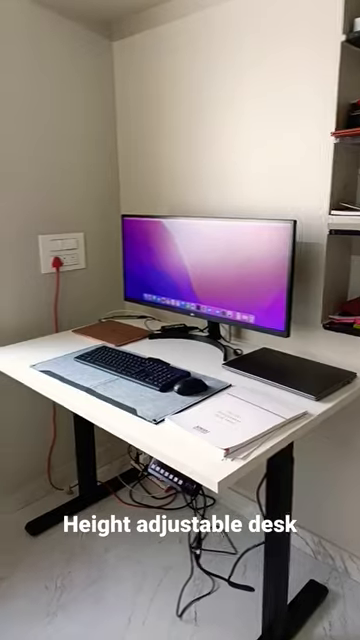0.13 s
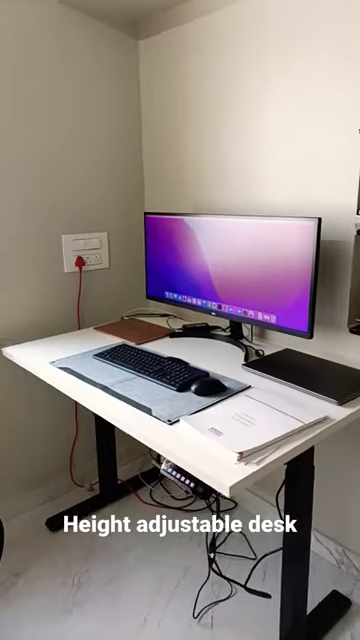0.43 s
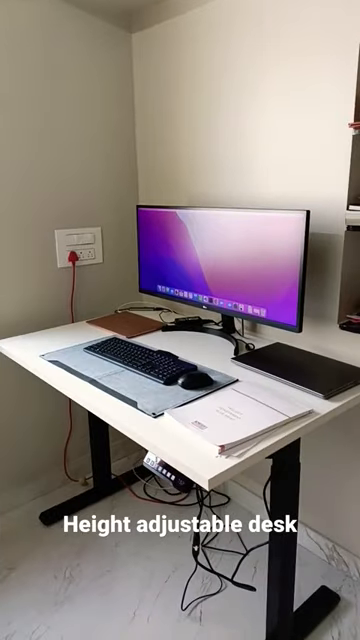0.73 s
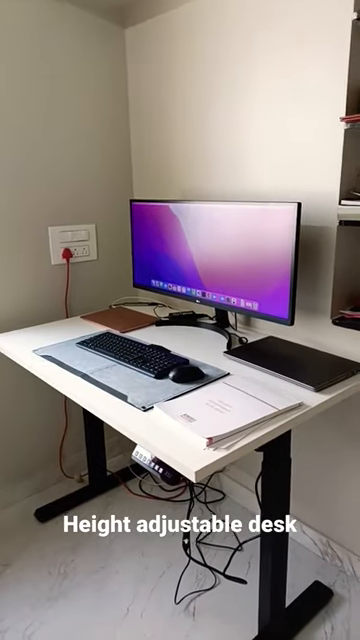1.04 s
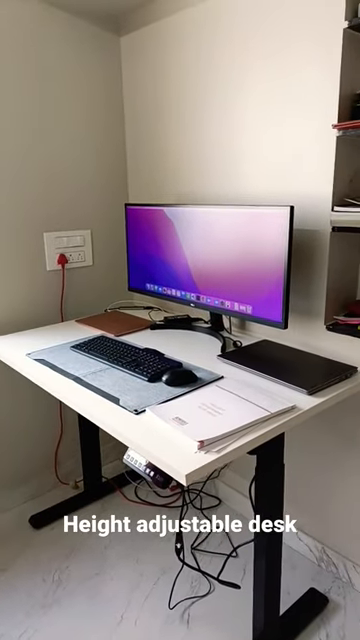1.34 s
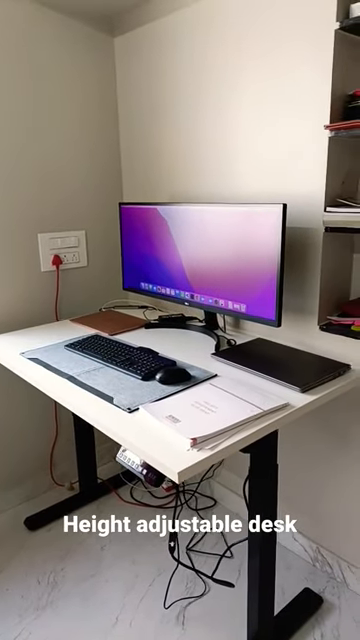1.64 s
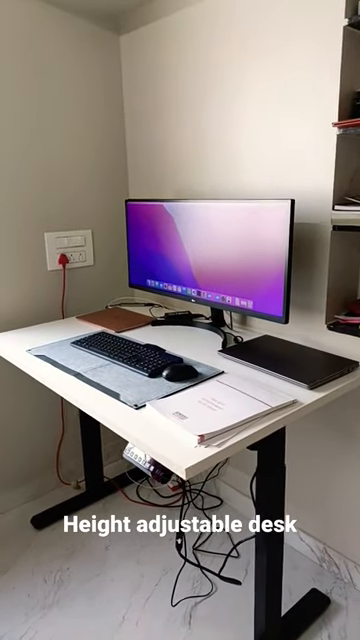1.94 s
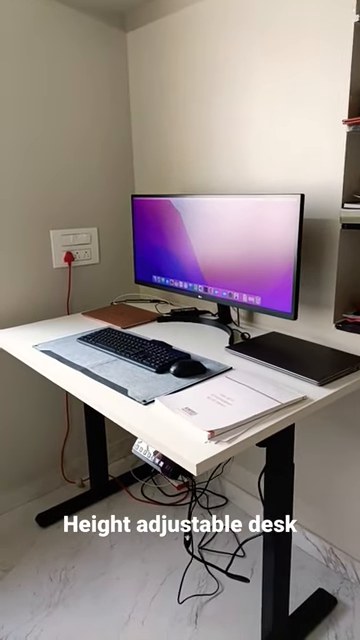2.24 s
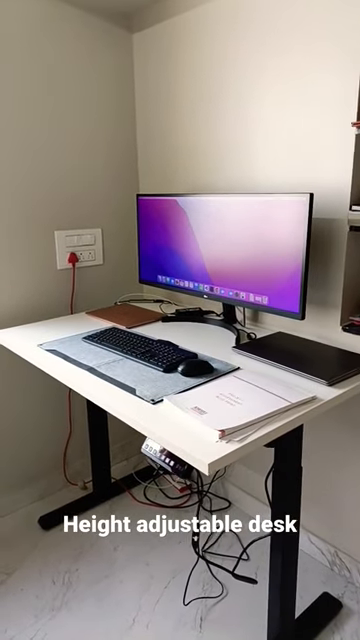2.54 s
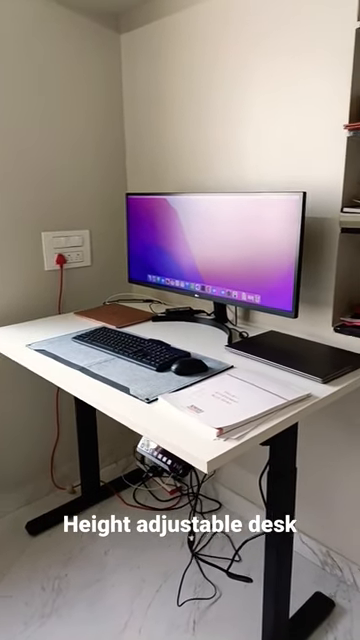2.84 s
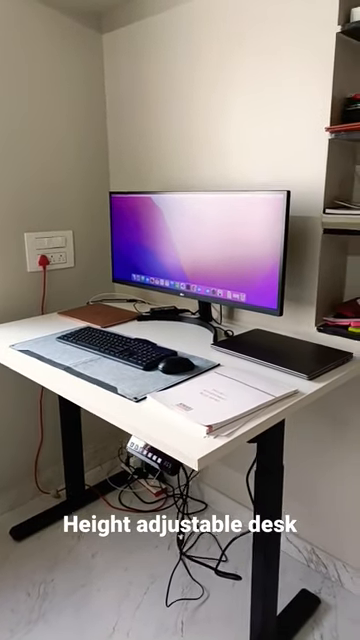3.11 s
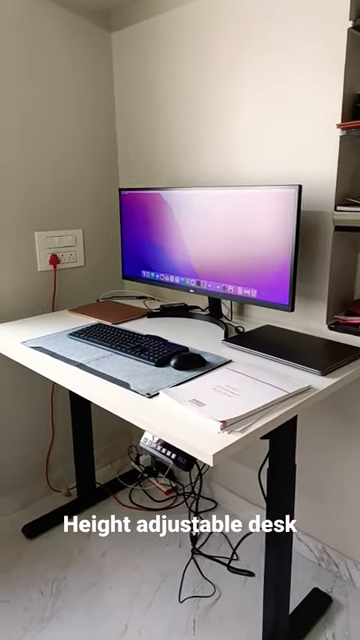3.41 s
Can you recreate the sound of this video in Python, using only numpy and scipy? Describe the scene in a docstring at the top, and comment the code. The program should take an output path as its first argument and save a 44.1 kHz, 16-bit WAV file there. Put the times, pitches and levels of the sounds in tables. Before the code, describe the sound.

A height-adjustable desk motor whines steadily over low rumble and hiss, with a brief late squeal.

```python
"""Desk motor in a small room

Small hard-walled room, two microphone channels; no echo is added, so all sources stay close.
The motor of a height-adjustable desk runs steadily, creeping up in speed: slot harmonics of its rotor
whine over pulsing brush hiss noise, and a low rumble is noise plus narrow bands of hum.
Near the end the leg squeals briefly, one wavering tone with a rasp.
Behind them lies a steady electrical whine of lines about 100 Hz apart."""
import sys
import numpy as np
from scipy import signal
from scipy.fft import rfft, irfft, next_fast_len
from scipy.io import wavfile

SR = 44100
rng = np.random.default_rng(int(sys.argv[2]) if len(sys.argv) > 2 else 0)


def unload_audio(sound):
    """Save the sound as a 16-bit wav file, at the path given as the first command line argument."""
    columns = np.transpose(np.atleast_2d(sound))
    # keep every value between -1 and 1, then stretch to whole-number steps
    steps = np.round(np.clip(columns, -1, 1) * 32767)
    wavfile.write(sys.argv[1], SR, steps.astype(np.int16))


N = 157437
TIME = np.arange(N) / SR  # s

# Level curves marked "shape" are scaled to unit power: only their rise and fall counts.
# rotor slots passing: (time [s], rate [Hz])
SLOT_RATE = [(.13, 765.3), (.48, 765.8), (.67, 768.3), (1.24, 769.5), (1.76, 773.1), (2.39, 776.2),
             (2.77, 776.3), (3.14, 777.1), (3.57, 777)]
# slot harmonics: (multiple, line level [dB], once-per-turn sideband level [dB], left minus right [dB])
SLOT_HARMONICS = [(1, -51.5, -68, 2), (2, -56.5, -71, -6.5), (3, -57.5, -72.5, 3), (4, -61, -64, -3.5),
                  (5, -61, -66, -5.5), (6, -71, -83, 12), (7, -66.5, -66.5, 1), (8, -72.5, -80.5, -14),
                  (9, -72.5, -75.5, -3), (10, -63.5, -70, 11), (11, -84, -74, -4), (12, -83, -74.5, 14),
                  (14, -67.5, -76, -1.5), (15, -68.5, -71, -1), (18, -79, -75, -11), (19, -74.5, -79, -7)]
# shape of the first slot harmonic: (time [s], level [dB])
FIRST_SHAPE = [(0.15, -50.5), (0.57, -55.5), (0.71, -66), (0.99, -52.5), (1.09, -56), (1.29, -49),
               (1.57, -52.5), (2.9, -50), (3.55, -55), (3.57, -54)]
# shape of the second slot harmonic: (time [s], level [dB])
SECOND_SHAPE = [(0.15, -64), (0.24, -67.5), (0.85, -60.5), (1.23, -68.5), (1.29, -60), (2.24, -64),
                (2.31, -77), (2.59, -66), (2.66, -56), (2.78, -69), (3.57, -62.5)]
# shape of the third slot harmonic: (time [s], level [dB])
THIRD_SHAPE = [(.15, -59.5), (.65, -56), (.95, -58.5), (1.15, -62), (1.35, -58), (1.7, -58), (2.08, -60),
               (2.45, -66.5), (2.87, -63), (3.1, -58.5), (3.57, -58)]
# shape of the fifth slot harmonic: (time [s], level [dB])
FIFTH_SHAPE = [(.15, -56.5), (.45, -59.5), (1, -64.5), (1.45, -64), (1.8, -58.5), (2.18, -59.5),
               (2.38, -69), (2.68, -54.5), (2.9, -57.5), (3.1, -56), (3.57, -62.5)]
# shape of the tenth slot harmonic: (time [s], level [dB])
TENTH_SHAPE = [(.15, -62), (.75, -69.5), (.95, -62.5), (1.7, -63), (1.95, -59.5), (2.35, -56), (2.48, -68),
               (2.6, -49), (2.8, -67), (3.05, -64.5), (3.57, -62.5)]
# brush hiss: (frequency [Hz], left density [dB per Hz], right density [dB per Hz])
HISS_SPECTRUM = [(196, -101, -108), (463, -92, -83.5), (766, -83.5, -91.5), (1140, -89, -86),
                 (1570, -98, -91), (2190, -89, -89.5), (2620, -95.5, -93), (2960, -88.5, -92),
                 (4300, -100.5, -94.5), (5160, -99, -93), (6400, -100, -96.5), (7200, -100, -99),
                 (8600, -98, -100), (9880, -99, -100), (9930, -90.5, -94.5), (10340, -106, -106),
                 (11100, -98.5, -89.5), (10800, -100, -99), (11300, -96, -99.5), (12000, -99, -93.5),
                 (12400, -99, -95.5), (13100, -110, -101), (14300, -106, -100.5), (15200, -122, -101)]
# shape of the hiss: (time [s], level [dB])
HISS_SHAPE = [(0.15, -57), (0.55, -55.5), (0.59, -58), (2.04, -56), (3.55, -56), (3.57, -57)]
# squeal of the leg, true level: (time [s], level [dB])
SQUEAL_LEVEL = [(2.93, -96), (2.975, -52), (3.03, -58), (3.07, -46.5), (3.14, -42), (3.23, -48.5),
                (3.35, -61), (3.47, -70), (3.57, -61)]
# spindle rumble between the hum bands: (frequency [Hz], density [dB per Hz])
RUMBLE_SPECTRUM = [(20, -104), (48, -100), (62, -87), (90, -89.5), (130, -84.5), (250, -74), (380, -82.5),
                   (500, -86), (700, -97), (1200, -92.5), (2000, -106), (4000, -130)]
# low hum bands, from mains hum near 100 and 200 Hz, shaft-rate multiples and frame resonances:
# (frequency [Hz], nominal width [Hz], level [dB])
HUM_BANDS = [(62.9, 3.9, -70.5), (100.3, 3, -68.5), (117.9, 10.8, -56.5), (158.6, 10.6, -62),
             (173.9, 3.2, -58), (201.9, 3.2, -56.5), (208.4, 7.2, -62), (226, 9.6, -58.5), (250, 4.9, -59),
             (257.6, 6.4, -58.5), (284.9, 28.4, -62.5), (322, 3.1, -59.5), (346.3, 4.5, -62.5),
             (545, 6.1, -71)]
# shape of the boom in the low hum bands: (time [s], level [dB])
BOOM_SHAPE = [(.15, -59.5), (.6, -59), (.9, -52), (1.12, -48), (1.25, -56), (1.39, -54.5), (1.48, -62),
              (2.4, -64), (2.75, -57.5), (3.1, -63), (3.57, -60.5)]
# shape of the lowest hum band: (time [s], level [dB])
THRUM_SHAPE = [(.15, -70), (.75, -65), (.9, -84), (1.1, -68), (1.5, -68), (1.65, -55), (2.2, -67),
               (3.25, -70), (3.46, -53), (3.57, -66)]
# electrical whine: (frequency [Hz], level [dB], left minus right [dB])
ELECTRICAL_LINES = [(872, -75, 0), (963.4, -61.5, -32), (1070, -67.5, 5), (1167.4, -55, 2.5),
                    (1267, -82, -6)]
# shape of the strongest electrical line: (time [s], level [dB])
STRONG_LINE_SHAPE = [(.15, -61.5), (.5, -54), (1.1, -52.5), (1.8, -54), (2.3, -51), (2.8, -52), (3.3, -56),
                     (3.57, -59.5)]
# shape of the weaker electrical lines: (time [s], level [dB])
WEAK_LINES_SHAPE = [(.15, -53), (.45, -53.5), (.6, -55.5), (1.1, -59.5), (1.5, -64.5), (2.3, -65.5),
                    (2.9, -57.5), (3.57, -59.5)]

SLOTS, SLOTS_PER_SPINDLE_TURN = 12, 156
JITTER_HZ, JITTER_PER_S = 0.88, 13.5  # unevenness of the slot rate
WHINE_LEAD_RAD, WHINE_SWAY_RAD = 0.7, 0.4  # phase of the two lowest harmonics
SIDEBAND_FALL_DB = 8.5  # per step of the turning rate
FADE_PER_S, FADE_SHARE = 3.5, 0.45  # share: part of the power that fades by chance
SHAPED_FADE_SHARE = 0.5  # the same for the third, fifth and tenth harmonic
SLOT_DEPTH, TURN_DEPTH, HISS_FLUTTER_DB = 0.1, 0.086, 1
SQUEAL_HZ, SQUEAL_WAVER_HZ = 1433, 3.2
SQUEAL_RASP_DB, SQUEAL_RASP_RATE_HZ = -16, 240
THROB_AT_S, THROB_DB = 2.92, 1  # one crest of the throb, and its swing
BOOM_BELOW_HZ, RUMBLE_SIDE_DB = 140, -12.5
START_S, ATTACK_S, CUTOFF_HZ = 0.1274, 0.0033, 15520


def from_db(db):
    """Decibels to gain."""
    return 10 ** (np.asarray(db) / 20)


def rms_one(x):
    """Scale to unit power."""
    return x / np.sqrt(np.mean(np.abs(x) ** 2) + 1e-20)


def in_time(rows):
    """Join (time [s], value) rows by straight lines."""
    return np.interp(TIME, *np.transpose(rows))


def swell(rows):
    """A level curve as a gain of unit power."""
    return rms_one(from_db(in_time(rows)))


def pan(db):
    """Left and right gains of unit mean power, from left minus right in dB."""
    return rms_one(from_db(np.array([[db], [-db]]) / 2))


def angle_of(hz):
    """Running phase of a frequency curve."""
    return 2 * np.pi * np.cumsum(hz) / SR


def flutter(rate):
    """Complex chance with random size and phase, changing about rate times a second; unit power."""
    step = 20  # samples between draws
    pole = np.exp(-2 * np.pi * rate * step / SR)
    settle = 3000  # draws dropped while the filter settles
    draws = rng.standard_normal((2, N // step + settle + 2))
    slow = signal.lfilter([1], [1, -2 * pole, pole * pole], draws)[:, settle:]
    return rms_one(np.interp(np.arange(N) / step, np.arange(slow.shape[1]), slow[0] + 1j * slow[1]))


def drift(rate):
    """Slow real chance, spread 1."""
    return rms_one(flutter(rate).real)


def tone(angle, gain=1):
    """A sine of unit power under a real or complex gain."""
    return np.sqrt(2) * np.real(gain * np.exp(1j * angle))


def noise(hz, db):
    """White noise shaped in frequency to the given density in dB per Hz."""
    size = next_fast_len(N)
    f = np.maximum(np.fft.rfftfreq(size, 1 / SR), 1)
    gain = from_db(np.interp(np.log(f), np.log(hz), db))
    shaped = irfft(rfft(rng.standard_normal(size)) * gain, size)[:N]
    return shaped * np.sqrt(SR / 2)


def rotor_whine(slot):
    """Passing slots ring in harmonics, flanked by sidebands from the uneven turn."""
    out = np.zeros((2, N))
    turn = np.exp(1j * slot / SLOTS)
    shapes = {1: FIRST_SHAPE, 2: SECOND_SHAPE, 3: THIRD_SHAPE, 5: FIFTH_SHAPE, 10: TENTH_SHAPE}
    flanks = [turn ** j * from_db(-SIDEBAND_FALL_DB * abs(j)) for j in (-3, -2, -1, 1, 2, 3)]
    for multiple, line_db, side_db, pan_db in SLOT_HARMONICS:
        shape = swell(shapes[multiple]) if multiple in shapes else 1
        carrier = np.sqrt(2) * np.exp(1j * multiple * slot) * shape
        share = SHAPED_FADE_SHARE if multiple in shapes else FADE_SHARE
        for channel in range(2):
            if multiple <= 2:
                phase = WHINE_SWAY_RAD * drift(1.0) - channel * WHINE_LEAD_RAD
                # the multiple scales lead and sway
                line = np.exp(1j * multiple * phase)
            else:
                # upper harmonics fade separately at each microphone
                steady = np.exp(0.5j * np.pi * channel)
                line = rms_one(np.sqrt(1 - share) * steady + np.sqrt(share) * flutter(FADE_PER_S))
            sides = sum(flank * np.exp(2j * np.pi * rng.random()) for flank in flanks)
            sides = rms_one(sides * flutter(FADE_PER_S * np.sqrt(multiple)))
            both = from_db(line_db) * line + from_db(side_db) * sides
            out[channel] += pan(pan_db)[channel] * np.real(carrier * both)
    return out


def brush_hiss(slot):
    """Sliding brushes hiss, pulsing with every slot and every turn."""
    hz, left_db, right_db = np.transpose(HISS_SPECTRUM)
    turn = slot / SLOTS
    slot_pulse = SLOT_DEPTH * (np.cos(slot) + np.cos(2 * slot)) / 2
    turn_pulse = TURN_DEPTH * (np.cos(turn) + np.cos(3 * turn) / 2)
    pulsing = rms_one(1 + slot_pulse + turn_pulse)
    hiss = np.array([noise(hz, left_db), noise(hz, right_db)])
    return hiss * pulsing * swell(HISS_SHAPE) * from_db(HISS_FLUTTER_DB * drift(6.9))


def leg_squeal(pan_db=2.5, lead_rad=-0.35):
    """Friction in the leg sets one mode singing, with a rasp around it."""
    angle = angle_of(SQUEAL_HZ + SQUEAL_WAVER_HZ * drift(19))
    angles = angle + np.array([[lead_rad], [0]])
    rasp = from_db(SQUEAL_RASP_DB) * np.array([flutter(SQUEAL_RASP_RATE_HZ) for channel in range(2)])
    level = from_db(in_time(SQUEAL_LEVEL)) * (TIME > SQUEAL_LEVEL[0][0])
    return level * pan(pan_db) * tone(angles, 1 + rasp)


def low_rumble(slot, pan_db=-1.0):
    """Spindle rumble throbs once a spindle turn, among narrow hum bands of randomly varying level."""
    spindle = (slot - np.interp(THROB_AT_S, TIME, slot)) / SLOTS_PER_SPINDLE_TURN
    throb = rms_one(from_db(THROB_DB * np.cos(spindle)))
    boom = swell(BOOM_SHAPE)
    # mid is common to both microphones, side is opposite in them
    mid = throb * noise(*np.transpose(RUMBLE_SPECTRUM))
    side = noise(*np.transpose(RUMBLE_SPECTRUM))
    for i, (hz, width_hz, db) in enumerate(HUM_BANDS):
        if i == 0:
            motion = swell(THRUM_SHAPE)
        else:
            motion = boom if hz < BOOM_BELOW_HZ else throb
        gain = from_db(db) * motion
        angle = 2 * np.pi * hz * TIME
        mid = mid + gain * tone(angle, flutter(width_hz * 0.66))
        side = side + gain * tone(angle, flutter(width_hz * 0.53))
    return pan(pan_db) * (mid + from_db(RUMBLE_SIDE_DB) * side * np.array([[1], [-1]]))


def electrical_whine(waver_db=0.5, shiver_db=1.3, sway_rad=0.51):
    """Lines of fixed pitch; the weaker are clearest at first, and all sway in phase between channels."""
    out = np.zeros((2, N))
    strongest = max(row[1] for row in ELECTRICAL_LINES)
    for hz, db, pan_db in ELECTRICAL_LINES:
        if db == strongest:
            gain = swell(STRONG_LINE_SHAPE) * from_db(shiver_db * drift(25))
        else:
            gain = swell(WEAK_LINES_SHAPE) * from_db(waver_db * drift(1.8))
        sway = sway_rad * np.array([drift(1), drift(1)])
        out += from_db(db) * pan(pan_db) * tone(2 * np.pi * hz * TIME + sway, gain)
    return out


def scene():
    """One turning rotor drives whine, hiss and rumble; squeal and electrical whine join in."""
    slot = angle_of(in_time(SLOT_RATE) + JITTER_HZ * drift(JITTER_PER_S))
    motor = rotor_whine(slot) + brush_hiss(slot)
    return motor + leg_squeal() + low_rumble(slot) + electrical_whine()


def record(dry):
    """The sound cuts in abruptly after a silence; a steep low-pass removes the top."""
    opened = dry * np.clip((TIME - START_S) / ATTACK_S, 0, 1)
    low_pass = signal.ellip(12, 0.1, 80, CUTOFF_HZ, fs=SR, output="sos")
    return signal.sosfilt(low_pass, opened)


dry = scene()
out = record(dry)
unload_audio(out)
```